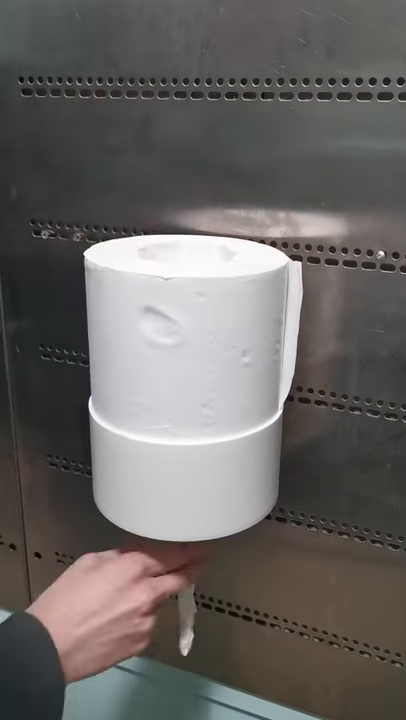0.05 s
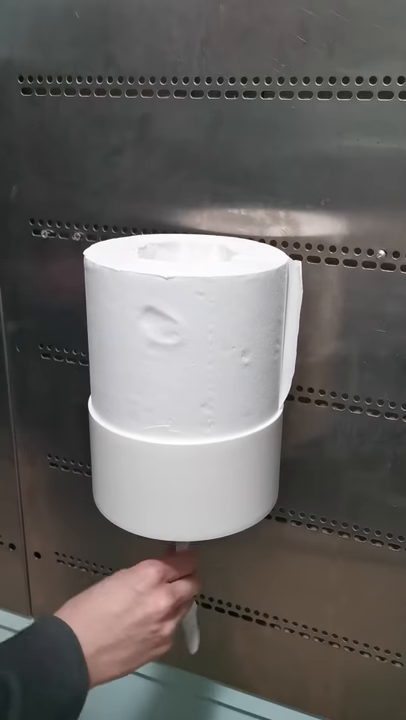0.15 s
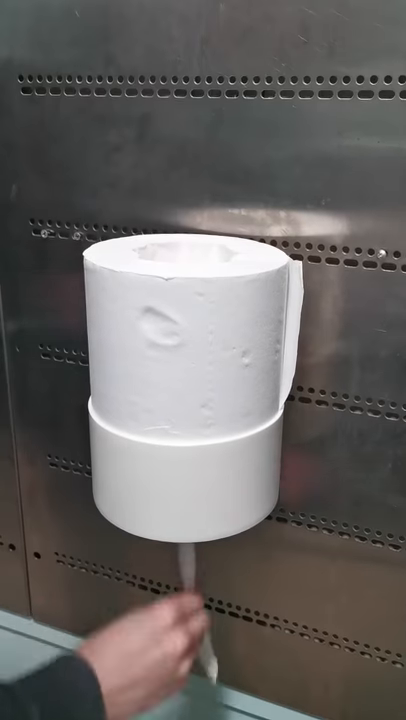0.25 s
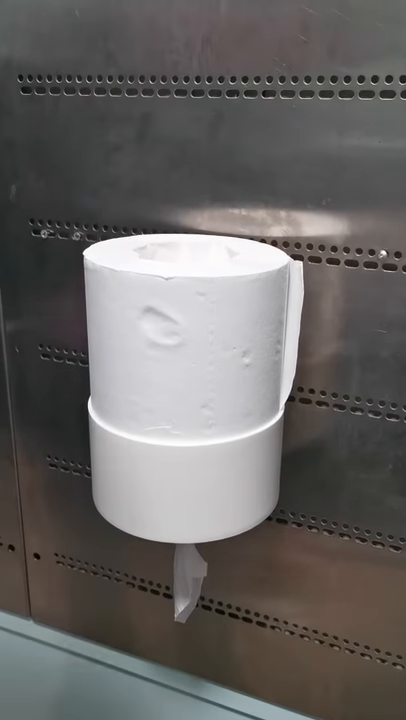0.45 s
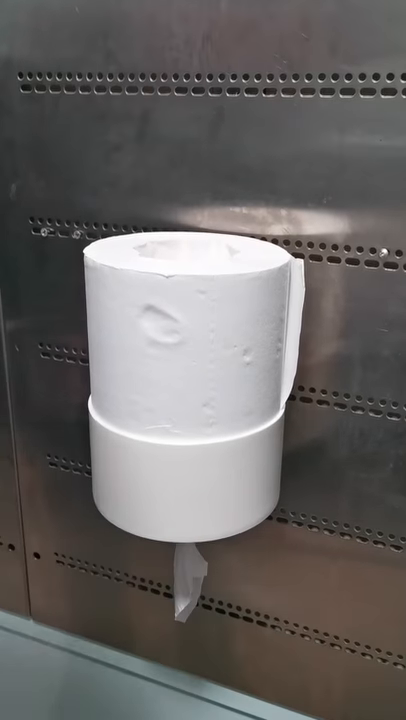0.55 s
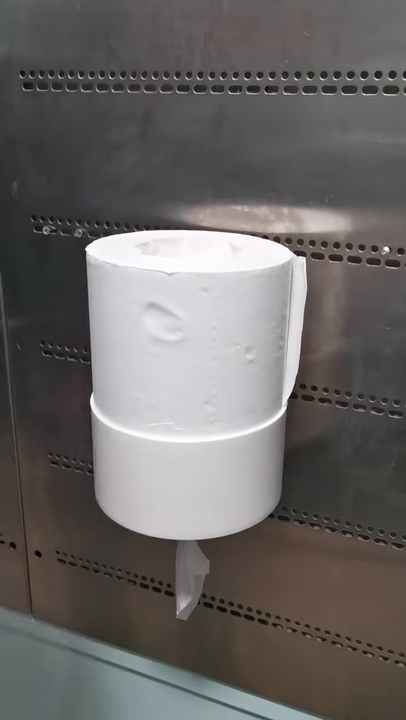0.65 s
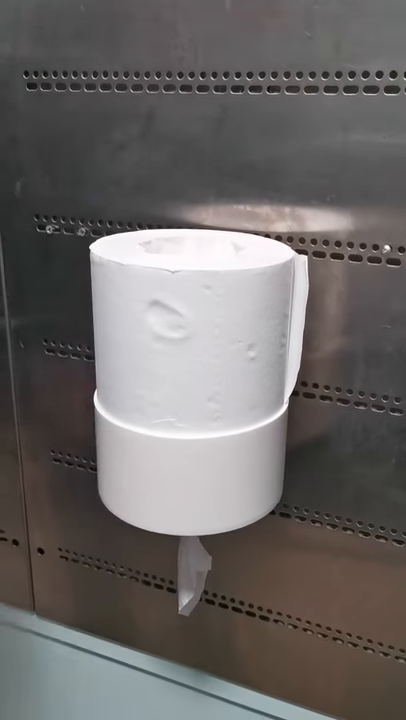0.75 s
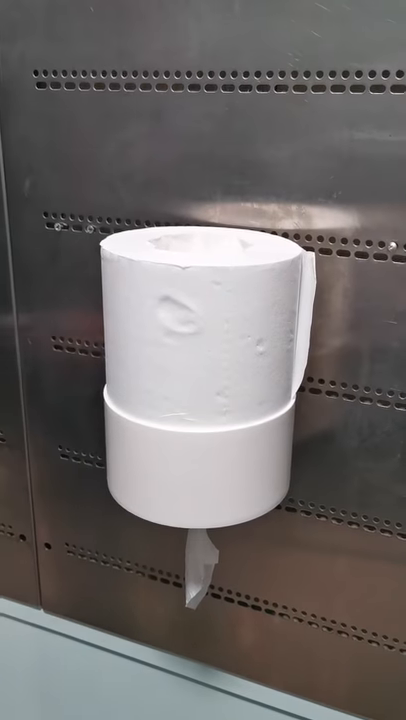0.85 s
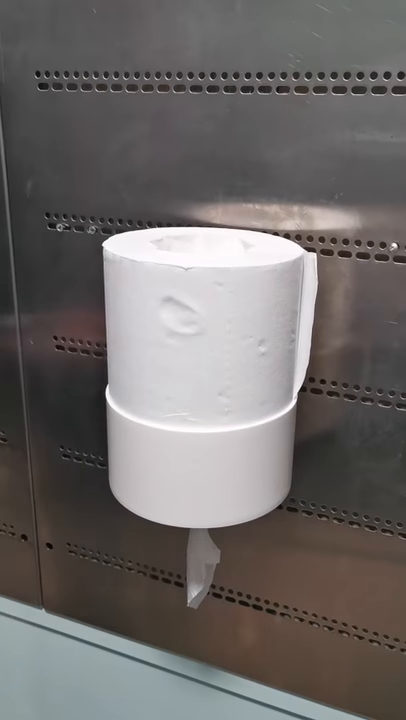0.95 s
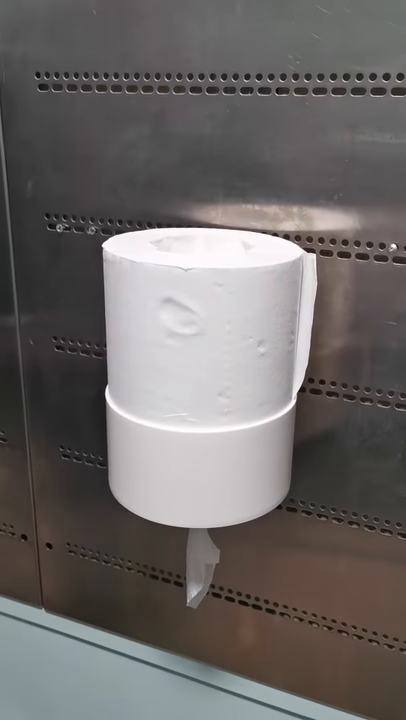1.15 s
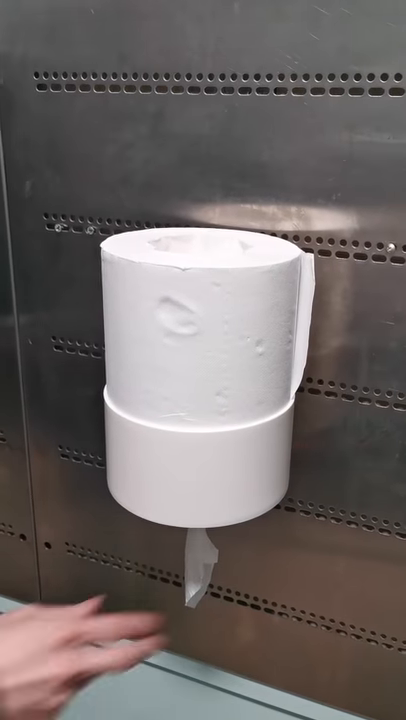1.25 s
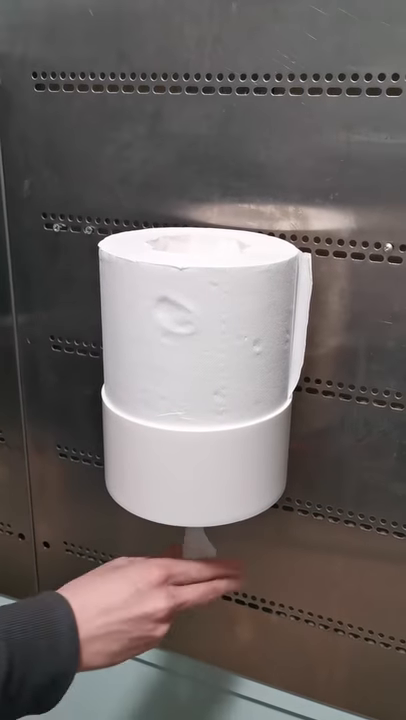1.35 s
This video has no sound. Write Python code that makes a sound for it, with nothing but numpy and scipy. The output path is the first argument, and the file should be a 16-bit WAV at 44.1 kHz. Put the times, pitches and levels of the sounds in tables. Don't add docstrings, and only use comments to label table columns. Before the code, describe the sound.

A paper towel is pulled with a hollow hum and torn off, then rustles softly in hand

```python
import sys
import numpy as np
from scipy import signal
from scipy.fft import rfft, irfft
from scipy.io import wavfile
from scipy.ndimage import uniform_filter1d

SR = 44100
rng = np.random.default_rng(int(sys.argv[2]) if len(sys.argv) > 2 else 0)


def to_wav(sig):
    pcm = np.clip(np.atleast_2d(sig), -1, 1) * 32767
    pcm = np.round(pcm).astype(np.int16)
    wavfile.write(sys.argv[1], SR, pcm.T)


def decibels_to_gain(level_db):
    exponent = np.asarray(level_db, float) / 20
    return 10 ** exponent


N = 61739

# (time [s], level [dB])
PULL_FRICTION = [
    (.1855, -58.5),
    (.225, -54.5),
    (.26, -50),
    (0.306, -44.5),
    (0.359, -45),
    (.39, -50),
    (.44, -55),
    (.46, -61),
    (.53, -62.5),
]
# (frequency [Hz], density [dB per Hz])
SLIDE_SPECTRUM = [(550, -5), (700, -12.5), (1100, -11.5), (2200, -16.5), (3300, -15.5), (6000, -20.5),
                  (11000, -22.5), (15800, -24)]
# (time [s], length [s], peak [dB], pitch [Hz])
TUGS = [(0.081, 0.028, -54, 440), (0.151, .02, -57.5, 436), (0.201, 0.076, -42.5, 420),
        (0.239, 0.017, -32.5, 431.6), (0.259, 0.0167, -34, 423), (0.278, 0.016, -31.5, 451.4),
        (0.293, 0.012, -26.5, 432), (.303, .025, -26.5, 416.4), (0.326, 0.0176, -30.5, 434),
        (.346, 0.0164, -23, 426.5), (0.365, 0.0187, -35.5, 440.5), (0.381, 0.011, -33.5, 412),
        (0.4, 0.013, -40, 415), (0.416, 0.021, -41, 443), (0.439, 0.035, -50.5, 431),
        (0.327, 0.037, -41, 254), (0.487, 0.042, -57, 218.5), (.275, .04, -40, 500)]
TUG_LEAN, TUG_FLATNESS = 0.64, 0.97
# (frequency [Hz], width [Hz], level [dB])
DRUM_MODES = [(420, 47, 1.5), (500, 83, -1), (295.6, 70, -4), (199, 50, -9), (615, 61, -6)]
DRUM_GROWTH_DB_PER_DB = 1.2
DRUM_ECHO_DB = -4
# (time [s], level [dB], length [s])
RIPS = [
    (0.3364, -36, 0.0027),
    (.3385, -28.5, 0.0033),
    (.3425, -30, .004),
    (.345, -30, .003),
    (.349, -33.5, 0.0034),
    (.354, -34, 0.0029),
]
# (frequency [Hz], density [dB per Hz])
RIP_SPECTRUM = [(200, -23), (430, -11), (900, -12), (2000, -18), (3600, -13.5), (6500, -14.5), (10700, -17),
                (15800, -20)]
# (time [s], rise [s], level [dB], t60 [s], crispness [0-1])
RUSTLES = [(0, 0.0013, -54, 0.63, 0.22), (0.069, 0.0062, -62.5, 0.17, 1), (.1855, .0005, -53, .1, 0.6),
           (0.454, 0.021, -52, 0.52, 0), (0.603, 0.0076, -59, 0.43, 0.02), (.699, 0.0037, -56, 0.57, 1),
           (.75, 0.0082, -75, .4, 1), (.805, 0.0036, -65, 1, 0.58), (0.874, 0.0025, -57, 0.57, 0.38),
           (.878, .025, -55, 0.65, 0.28), (.96, 0.013, -72.5, 0.58, .3), (1.015, 0.013, -76, 0.59, 0.8),
           (1.085, 0.036, -59.5, .15, 0.84), (1.04, 0.015, -73, 0.56, 1), (1.24, .015, -68, .3, 0),
           (1.365, 0.019, -58.5, 0.61, .5)]
# (frequency [Hz], density [dB per Hz])
DULL_SPECTRUM = [(400, -0.5), (900, -0.5), (1700, -3), (2800, -1), (4200, -5), (5600, -12.5), (15800, -22)]
# (frequency [Hz], density [dB per Hz])
CRISP_SPECTRUM = [(880, -46), (1500, -26), (1960, -13), (3430, -6.5), (7110, -3.5), (9100, -8),
                  (15800, -6.5)]
# (time [s], level [dB], t60 [s], pitch [Hz])
CREASES = [(0, -57.5, 0.37, 3420), (.19, -55, 0.25, 3700), (.25, -56, .1, 10500), (0.271, -46.5, .15, 3040),
           (.3, -41, .05, 7300), (.353, -56, 0.076, 4500), (.47, -57, .3, 3250), (.5, -60, .2, 3200),
           (.29, -54, .1, 3300), (.47, -62, .3, 700), (0.484, -53.5, .2, 1480), (.89, -60, 0.34, 2690),
           (1.11, -66, 0.25, 4500), (1.371, -58, .3, 4520)]
CREASE_Q, CREASE_RISE_S = 6.3, 0.0041
WALL_T60_S, WALL_DB = 0.2, -11
# (frequency [Hz], density [dB per Hz])
ROOM_SPECTRUM = [(15, -16.5), (35, 2.5), (60, -4), (150, -8), (212, -15), (450, -19), (3300, -27.5),
                 (15800, -40.5)]
ROOM_DB, ROOM_SWELL_DB = -55, 0.4
# (frequency [Hz], correlation [-1 to 1])
LIKENESS = [(60, 1), (180, 0.93), (550, 0.75), (1650, 0.011), (4970, -0.074), (15000, -0.16)]
# (frequency [Hz], left minus right [dB])
PORT_TILT = [(60, -1.5), (130, -2.5), (290, -0.5), (640, -6.5), (1410, -6), (3100, -8.5), (6820, -8),
             (15000, -4.5)]
# (frequency [Hz], width [Hz], level [dB])
PORT_PEAKS = [(3200, 285, -5.5), (4500, 1100, -11.5), (6670, 1240, -12.5), (10400, 810, -1.5)]
# (frequency [Hz], width [Hz], depth [0-1])
PORT_DIP = (8750, 2000, 0.44)
PORT_EDGE_HZ = 15820


def read(points, hz):
    f, value = np.transpose(points)
    return np.interp(np.log(hz + 1), np.log(f + 1), value)


def evened(x):
    return x / np.sqrt(np.mean(x ** 2) + 1e-20)


def grains(per_s, spread_db, smooth):
    hits = rng.random(N) < per_s / SR
    size = hits * decibels_to_gain(spread_db * np.minimum(rng.exponential(1, N), 4))
    clicks = evened(size * rng.standard_normal((2, N)))
    hiss = rng.standard_normal((2, N))
    return np.sqrt(1 - smooth) * clicks + np.sqrt(smooth) * hiss


def heard(pair, spectrum, cut_db_per_octave=-30):
    hz = np.fft.rfftfreq(N, 1 / SR)
    a, b = rfft(pair, axis=1)
    same = np.clip(read(LIKENESS, hz), -1, 1)
    right = same * a + np.sqrt(1 - same ** 2) * b
    below_db = np.minimum(cut_db_per_octave * np.log2(spectrum[0][0] / (hz + 1)), 0)
    gain = decibels_to_gain(read(spectrum, hz) + below_db)
    gain = gain / np.sqrt(np.mean(gain ** 2))
    return irfft(np.array([a, right]) * gain, N, axis=1)


def burst(start_s, rise_s, db, t60_s):
    u = np.maximum(np.arange(N) / SR - start_s, 0)
    rise = np.sin(np.pi / 2 * np.minimum(u / max(rise_s, 1e-4), 1)) ** 2
    return rise * decibels_to_gain(db - 60 * np.maximum(u - rise_s, 0) / t60_s)


def band(x, hz, width_hz):
    r = np.exp(-np.pi * width_hz / SR)
    turn = np.exp(2j * np.pi * hz * np.arange(N) / SR)
    ring = signal.lfilter([1 - r], [1, -r], x / turn)
    ring = signal.lfilter([1 - r], [1, -r], ring)
    return 2 * (turn * ring).real / np.sqrt(1 - r)


def drag_db():
    t = np.arange(N) / SR
    s, db = np.transpose(PULL_FRICTION)
    grip_db = 18000 * np.maximum(s[0] - t, 0)
    release_db = 200 * np.maximum(t - s[-1], 0)
    return np.interp(t, s, db) - grip_db - release_db


def slide():
    clumps = evened(uniform_filter1d(rng.standard_normal(N), 200))
    friction = decibels_to_gain(drag_db() + 3.5 + 0.93 * clumps)
    return heard(friction * grains(per_s=9000, spread_db=2.2, smooth=0.48), SLIDE_SPECTRUM)


def drum():
    t = np.arange(N) / SR
    friction_db = drag_db()
    top_db = np.max(friction_db)
    stir = decibels_to_gain(top_db + DRUM_GROWTH_DB_PER_DB * (friction_db - top_db)) * rng.standard_normal(N)
    out = sum(decibels_to_gain(db) * band(stir, hz, width) for hz, width, db in DRUM_MODES)
    for (s, length, db, hz), phase in zip(TUGS, rng.random(len(TUGS))):
        progress = np.clip((t - s) / length, 0, 1)
        swell = abs(np.sin(np.pi * progress ** TUG_LEAN)) ** TUG_FLATNESS
        swell = swell * (t > s) * (t < s + length)
        out += decibels_to_gain(db) * swell * np.sin(2 * np.pi * (hz * (t - s) + phase))
    return out


def rip():
    shape = sum(burst(s, length / 2, db, 4.42 * length) for s, db, length in RIPS)
    return heard(shape * grains(per_s=18000, spread_db=1.0, smooth=0.92), RIP_SPECTRUM)


def rustle():
    dull, crisp = np.zeros(N), np.zeros(N)
    for s, rise, db, t60, crispness in RUSTLES:
        move = burst(s, rise, db, t60)
        dull += np.sqrt(1 - crispness) * move
        crisp += np.sqrt(crispness) * move
    folded = heard(dull * grains(per_s=9000, spread_db=3.7, smooth=0.49), DULL_SPECTRUM)
    flat = heard(crisp * grains(per_s=9800, spread_db=1.5, smooth=0.89), CRISP_SPECTRUM)
    return folded + flat


def creases():
    scrape = grains(per_s=3200, spread_db=2.7, smooth=0.5)
    out = np.zeros((2, N))
    for s, db, t60, hz in CREASES:
        out += band(burst(s, CREASE_RISE_S, db, t60) * scrape, hz, hz / CREASE_Q)
    return np.array([out[0] + 0.13 * out[1], out[1]])


def patchy(x, depth_db):
    hz, _, z = signal.stft(x, SR, nperseg=256, noverlap=192)
    field = rng.standard_normal(z.shape[1:])
    field = uniform_filter1d(field, size=5, axis=0)
    field = evened(uniform_filter1d(field, size=14, axis=1))
    treble = np.minimum(hz / 3000, 1)[:, None]
    z = z * decibels_to_gain(depth_db * field * treble)
    return signal.istft(z, nperseg=256, noverlap=192)[1][:, :N]


def walls(x):
    n = SR // 2
    signs = rng.choice([-1., 1.], (2, n))
    sparse = rng.random((2, n)) < 0.05
    taps = signs * sparse * decibels_to_gain(-60 * np.arange(n) / SR / WALL_T60_S)
    taps[:, :150] = 0
    taps = taps / np.linalg.norm(taps[0])
    return decibels_to_gain(WALL_DB) * signal.fftconvolve(x, taps, axes=1)[:, :N]


def room():
    swell = uniform_filter1d(rng.standard_normal(N), 3000)
    swell = evened(uniform_filter1d(swell, 3000))
    return decibels_to_gain(ROOM_DB + ROOM_SWELL_DB * swell) * heard(rng.standard_normal((2, N)), ROOM_SPECTRUM)


def scene():
    paper = patchy(slide() + rustle(), depth_db=1.87) + rip() + creases()
    air = drum()
    late = np.roll(air, 4) * decibels_to_gain(0.76)
    drum_echo = decibels_to_gain(DRUM_ECHO_DB) * walls(np.array([air, air]))
    return paper + walls(paper) + np.array([air, late]) + drum_echo + room()


def top_cut(x):
    return signal.sosfilt(signal.butter(12, 16050, fs=SR, output="sos"), x)


def record(dry):
    hz = np.fft.rfftfreq(N, 1 / SR)
    peaks = sum(decibels_to_gain(db) / (1 + ((hz - f) / (width / 2)) ** 2) for f, width, db in PORT_PEAKS)
    dip_hz, dip_width_hz, depth = PORT_DIP
    dip = 1 - depth / (1 + ((hz - dip_hz) / (dip_width_hz / 2)) ** 2)
    tilt_db = read(PORT_TILT, hz) / 2
    ports = np.array([decibels_to_gain(tilt_db), decibels_to_gain(-tilt_db) * dip * (0.7 + peaks)])
    ports = ports / (1 + (hz / PORT_EDGE_HZ) ** 300)
    mix = irfft(rfft(dry, axis=1) * ports, N, axis=1)
    return top_cut(mix)


dry = scene()
out = record(dry)
to_wav(out)
```